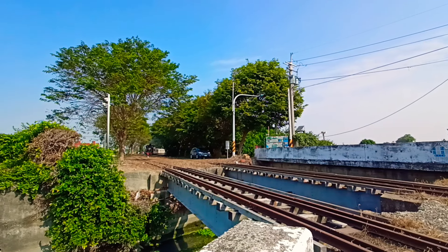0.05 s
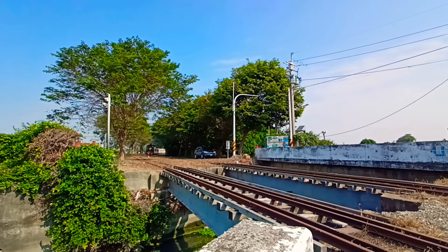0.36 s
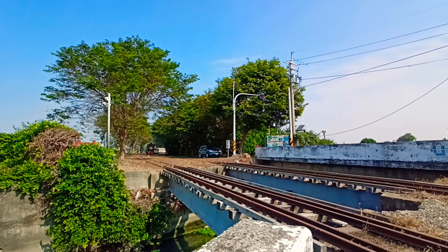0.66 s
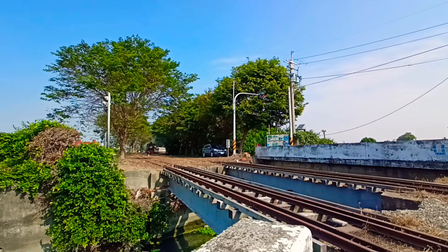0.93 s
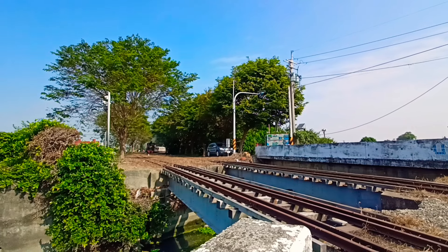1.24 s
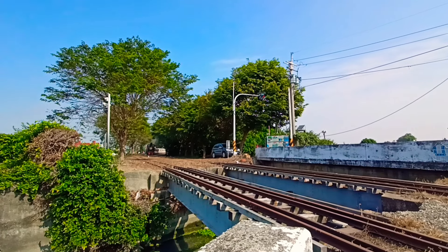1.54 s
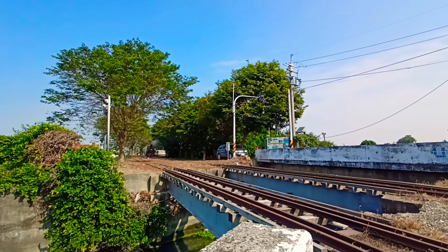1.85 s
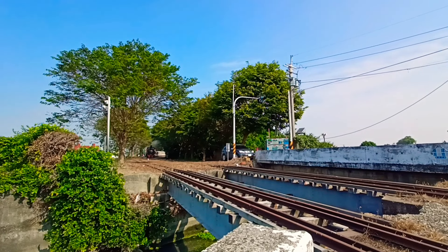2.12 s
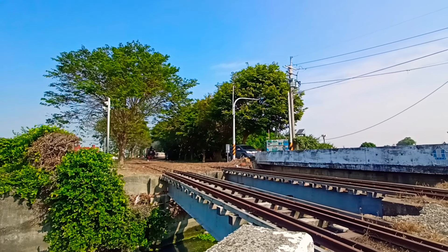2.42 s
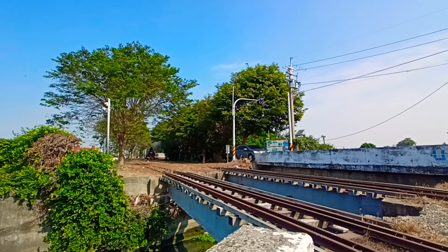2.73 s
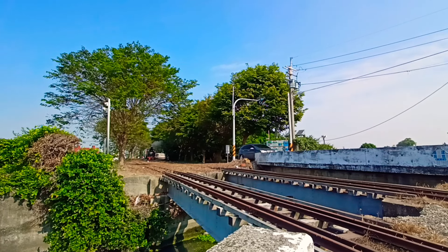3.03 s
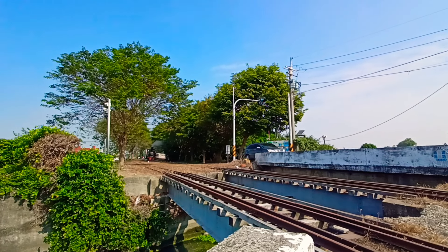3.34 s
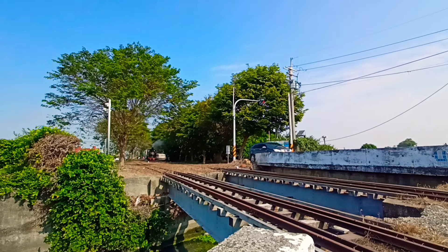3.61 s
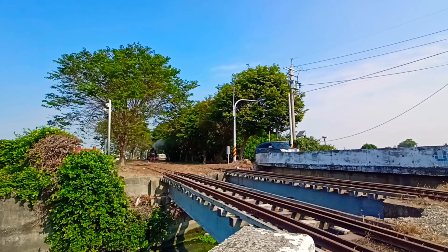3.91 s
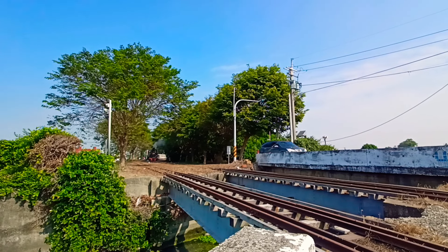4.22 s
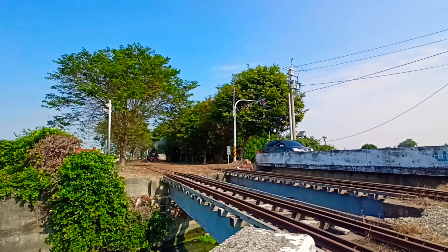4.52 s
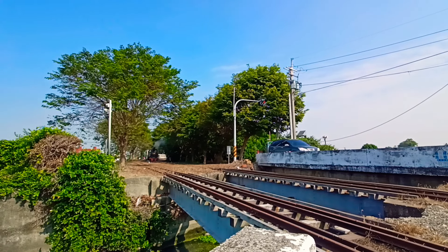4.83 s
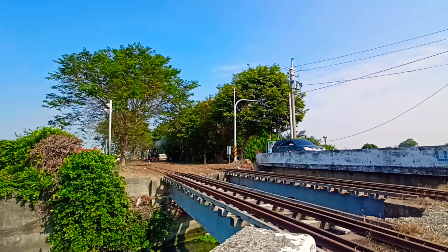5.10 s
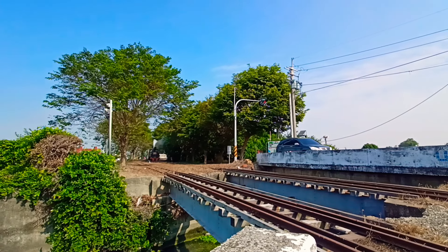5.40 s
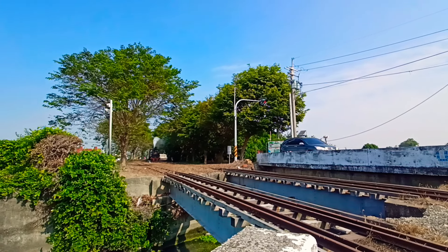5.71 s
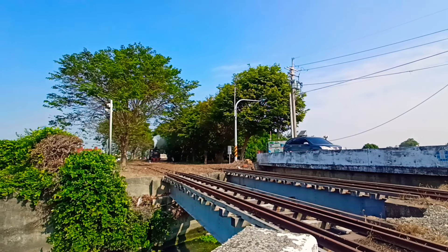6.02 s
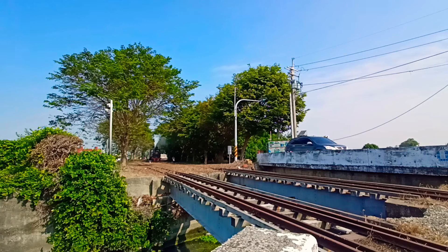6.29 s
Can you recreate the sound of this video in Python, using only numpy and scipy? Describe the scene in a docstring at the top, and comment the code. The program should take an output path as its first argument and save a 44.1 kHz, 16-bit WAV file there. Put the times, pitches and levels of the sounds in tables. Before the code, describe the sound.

Outdoors by a railway bridge, several cameras fire short bursts of shutter clicks. A small bird ticks in high trills, with scattered chirps and faint insect buzzes. A breeze rumbles softly on the microphone and a car passes faintly. Near the end, a steam locomotive blows its whistle: one loud, held note that scoops up to pitch and wavers inside a strong hiss of steam.

```python
"""Steam whistle by a railway bridge

Three cameras fire bursts of shutter clicks while small birds tick and chirp over a gusty breeze
and a slowly passing car. Then a steam locomotive opens its whistle: one pipe note that scoops
up to pitch and beats against its own echo, in the loud hiss of the steam jet."""
import sys
import numpy as np
from scipy import signal
from scipy.fft import rfft, irfft
from scipy.io import wavfile
from scipy.ndimage import uniform_filter1d, minimum_filter1d

SR = 44100
rng = np.random.default_rng(int(sys.argv[2]) if len(sys.argv) > 2 else 0)


def waveform_to_disk(signal):
    """Save audio, clipped to [-1, 1], as 16-bit WAV at the path in sys.argv[1]."""
    frames = np.transpose(np.atleast_2d(signal))
    scaled = np.clip(frames, -1, 1) * 32767
    samples = np.round(scaled).astype(np.int16)
    wavfile.write(sys.argv[1], SR, samples)


N = 288855
TIME_S = np.arange(N) / SR

# wind on the microphone: freq_hz, relative_db
WIND_SPECTRUM = [(20, -41), (35, -15), (52, -7), (85, 2), (120, 2), (170, -3), (240, -13.5), (400, -34)]
# breeze strength: time_s, level_db
WIND_LEVEL = [(0, -48), (.8, -40), (1.3, -43), (1.75, -38.5), (2.05, -49), (2.5, -43), (3, -49.5),
              (4.05, -48), (4.8, -44.5), (5.37, -40.5), (5.46, -47.5), (5.65, -45), (6.0, -57), (6.55, -54)]
# wind puffs: time_s, boost_db
GUSTS = [(.83, 4), (.93, 0), (1.02, 4.5), (1.57, 7.5), (1.68, -2), (1.79, 9), (2.43, 10.5), (4.43, 9.5),
         (4.73, 14), (4.83, 15.5), (5.05, 7.5), (5.24, 2), (5.39, 11.5)]
# far traffic: freq_hz, relative_db
ROAD_SPECTRUM = [(100, 9), (230, 4.5), (310, -1.5), (430, 1), (560, -3), (660, -5.5), (940, -8),
                 (1130, -13), (1360, -8), (1600, -13), (1860, -10), (2080, -15), (2750, -22), (4000, -23)]
# leaves and far insects: freq_hz, relative_db
FOLIAGE_SPECTRUM = [(1500, -5), (3000, -5.5), (4200, 3), (5500, -2.5), (6500, -1), (7600, 1), (8400, -3),
                    (9200, -8.5), (10500, -10.5), (11800, -16.5), (15500, -13)]
# far sounds: time_s, road_db, foliage_db
FAR_LEVELS = [(0.0, -50.5, -61), (1.3, -50, -61), (1.75, -47, -60), (2.5, -47, -60), (3.7, -48, -58.5),
              (5.2, -48.5, -57.5), (6.55, -54, -58)]
# small bird's trills: start_s, tick_count, first_gap_s, peak_db, top_hz
TRILLS = [(.0378, 4, .0454, -39.5, 5400), (.5732, 8, .0427, -37.5, 5420), (1.9132, 18, .0415, -35.3, 5380),
          (3.6529, 7, .0427, -36, 5345), (4.4444, 10, .0429, -35, 5370)]
# shutter bursts: start_s, frame_count, gap_s, level_db, camera
BURSTS = [(.238, 2, .207, -3.5, 0), (1.2794, 2, .1978, -3, 0), (2.597, 1, .3343, -4.5, 1),
          (4.317, 4, .3343, -3.3, 1), (1.605, 4, .075, -3, 2), (2.4955, 4, .075, -3.5, 2),
          (3.3147, 2, .075, -3.2, 2), (3.8156, 2, .075, -3.5, 2), (4.755, 3, .075, -3.2, 2)]
# mirror and curtain strokes per release: camera, offset_s, level_db, t60_s
STROKES = [(0, -.051, -37.5, .038), (0, -.043, -45, .065), (0, -.022, -35.5, .05), (0, 0, -32.5, .043),
           (0, .012, -43, .087), (0, .022, -42.5, .06), (0, .0395, -32.7, .04), (0, .053, -35.5, .022),
           (1, -.044, -36.5, .067), (1, -.037, -41.5, .2), (1, 0, -25, .042), (1, .0228, -24.5, .015),
           (1, .026, -28, .035), (2, 0, -33, .026), (2, .008, -40, .03), (2, .016, -41.5, .013)]
# camera body ring: freq_hz, camera0_db, camera1_db, camera2_db
BODY_SPECTRA = [(407, -31, -18, 3.5), (1100, 3, -6.5, -18), (1440, -4, -1, -4), (1900, -4.5, -1, -9),
                (2360, -5, -11.5, -32), (2620, -3.5, -2.5, 2.5), (3320, -2, -4, -7), (4060, -2, 5, 1.5),
                (4830, -0.5, -0.5, -11), (5550, 0.5, -4.5, -1), (6500, 3, -5.5, -3.5), (7430, 3.5, 4.5, 5),
                (9300, 0, -5.5, -3.5), (10900, -5, -14, -12), (12500, -8, -13, -10), (15500, -8, -19, -22)]
# sparrow-like chirps: start_s, level_db, kind
CHIRPS = [(0.589, -50, "slip"), (.912, -50.5, "cheep"), (.977, -52.5, "low"), (1.039, -53.5, "low"),
          (1.206, -53, "chur"), (1.294, -44.5, "rasp"), (1.33, -51, "fall"), (1.388, -55.5, "low"),
          (1.749, -43.5, "arch"), (2.27, -59, "fall"), (3.139, -44.5, "rasp"), (3.182, -52, "fall"),
          (3.222, -44.5, "arch"), (3.247, -53.5, "low"), (4.93, -51, "slip"), (5.069, -51, "rasp"),
          (5.144, -49.5, "slip")]
# chirp shapes by kind: length_s, start_hz, middle_hz, end_hz, warble_hz, third_harmonic_gain
CHIRP_SHAPES = {"arch": (.037, 3330, 4400, 3350, 120, 0), "cheep": (.041, 3950, 4800, 3800, 250, 0),
                "rasp": (.048, 4420, 4090, 3730, 540, 0), "fall": (.027, 3760, 2990, 2420, 110, 0),
                "low": (.027, 2050, 2010, 1970, 20, .5), "chur": (.049, 3270, 3500, 3200, 170, 0),
                "slip": (.014, 5400, 4800, 4250, 100, 0)}
# insect-like buzzes: start_s, level_db
BUZZES = [(1.388, -45), (2.244, -45.5), (2.404, -44.5), (2.6, -41.5), (2.87, -47.5), (3.403, -43),
          (3.6, -43.5), (3.74, -43), (3.938, -45.5), (4.208, -49)]
# tyre drone: freq_hz, relative_db
TYRE_SPECTRUM = [(400, -32), (450, -12), (490, -10), (555, 1), (630, -12), (880, -13), (950, -3.5),
                 (1020, -27)]
# steam jet: time_s, roar_db, sizzle_db
JET_LEVELS = [(5.24, -46, -61), (5.35, -38, -40.5), (5.395, -26, -30), (5.56, -27.5, -33),
              (5.92, -31, -31.5), (6.15, -28, -29.5), (6.27, -30, -25), (6.55, -31, -28)]
# jet roar: freq_hz, relative_db
ROAR_SPECTRUM = [(300, -43), (600, -14.5), (850, -1.5), (1100, -5), (1300, -1), (1550, -6), (1950, -3),
                 (2400, -8), (3050, -9), (3600, 1), (4600, 0.5), (5450, -9), (5800, -2), (7500, 4),
                 (8300, -3.5), (8950, -24), (9300, -6), (10500, -11)]
# jet sizzle: freq_hz, relative_db
SIZZLE_SPECTRUM = [(6000, -7.5), (8900, -4), (9400, -3), (10500, -4.5), (12000, -7), (13500, -7.5),
                   (14700, -6.5), (15500, -9)]
# whistle partials: harmonic, offset_db, echo_share, scatter_share, flutter_hz
PARTIALS = [(1, 0, 0.82, 0.17, 24), (2, 0, 0.43, 0.53, 15.3), (3, -14.5, .4, 0.56, 45), (4, .5, 0, .65, 29),
            (5, -1.5, 0.37, 0.63, 27), (6, -15.5, 0.5, .65, 25), (7, -19, .4, 0.5, 35),
            (8, -13.5, .4, 0.97, 15), (9, -30, .4, 0.7, 50), (10, -21, .4, 0.7, 50)]
# held note: time_s, fundamental_db, octave_db, upper_db
WHISTLE_LEVELS = [(5.385, -12.5, -17.5, -31), (5.415, -9.5, -16, -22.5), (5.46, -8, -15.5, -23),
                  (5.56, -8, -27.5, -24.5), (5.69, -11, -14.5, -29), (5.84, -13.5, -17.5, -26),
                  (6.07, -20, -20.5, -27.5), (6.25, -17.5, -20.5, -29), (6.42, -13.5, -23.5, -28),
                  (6.55, -14.5, -21.5, -26)]
# whistle echo against the direct note: time_s, echo_gain
ECHO_GAIN = [(5.4, 0), (5.68, .36), (5.85, .24), (5.96, .62), (6.08, .35), (6.24, .5), (6.55, .25)]


def gain_of(db):
    """Decibels to amplitude."""
    return 10 ** (np.asarray(db) / 20)


def unit_rms(x):
    """Scales to unit rms."""
    return x / np.sqrt(np.mean(abs(x) ** 2) + 1e-20)


def curve(rows, column=1):
    """One column of a time table, per sample."""
    rows = np.array(rows)
    return np.interp(TIME_S, rows[:, 0], rows[:, column])


def add(mix, start_s, sound):
    """Mixes a sound in at start_s."""
    part = mix[max(round(start_s * SR), 0):][:len(sound)]
    part += sound[:len(part)]


def coloured(x, spectrum):
    """Filters by a (freq_hz, relative_db) outline; white noise keeps its power."""
    hz, db = np.transpose(spectrum)
    f = np.fft.rfftfreq(N, 1 / SR) + 1
    skirts = (np.minimum(f / hz[0], 1) * np.minimum(hz[-1] / f, 1)) ** 2
    gain = skirts * gain_of(np.interp(np.log(f), np.log(hz), db))
    return irfft(rfft(x) * unit_rms(gain), N)


def noise(spectrum):
    """Unit noise with the given outline."""
    return coloured(rng.standard_normal(N), spectrum)


def wander(rate_hz):
    """Unit random drift up to about rate_hz."""
    f = np.fft.rfftfreq(N, 1 / SR)
    return unit_rms(irfft(rfft(rng.standard_normal(N)) / (1 + (f / rate_hz) ** 2), N))


def turbulent(x, depth_db, patch_bins):
    """Lumpy noise: time-frequency patches swell and sink."""
    bins = signal.stft(x, nperseg=256)[2]
    patches = uniform_filter1d(rng.standard_normal(bins.shape), patch_bins, 0)
    patches = unit_rms(uniform_filter1d(patches, patch_bins, 1))
    return unit_rms(signal.istft(bins * gain_of(depth_db * patches), nperseg=256)[1][:N])


def outdoors(x, wet_db, t60_s):
    """Adds sparse echoes from ground, bridge and trees."""
    t = TIME_S[:SR // 2]
    taps = rng.standard_normal(len(t)) * (rng.random(len(t)) < .03)
    taps *= (t > .006) * gain_of(-60 * t / t60_s)
    return x + gain_of(wet_db) * signal.fftconvolve(x, taps / np.linalg.norm(taps))[:N]


def wind(trim_db=.5, gust_s=.015):
    """Breeze rumbling on the microphone, with brief puffs."""
    gust_db = sum(db * np.exp(-((TIME_S - at_s) / gust_s) ** 2) for at_s, db in GUSTS)
    return noise(WIND_SPECTRUM) * gain_of(curve(WIND_LEVEL) + trim_db + gust_db)


def traffic(trim_db=2):
    """Lumpy wash of a far road."""
    wash = turbulent(noise(ROAD_SPECTRUM), depth_db=1.5, patch_bins=9)
    return wash * gain_of(curve(FAR_LEVELS, column=1) + trim_db)


def foliage(trim_db=3):
    """Thin hiss of leaves and far insects."""
    return noise(FOLIAGE_SPECTRUM) * gain_of(curve(FAR_LEVELS, column=2) + trim_db)


def ticking_bird(trim_db=.5, octave_db=-33, spread_db=.9, pitch_spread=.011):
    """Trills that slow as the bird tires; each tick hooks up to its top pitch."""
    tick_s, lead_s, gap_growth_s = .014, .003, .00074
    hook_depth, hook_s = .3, .0023
    out = np.zeros(N)
    for start_s, tick_count, gap_s, peak_db, top_hz in TRILLS:
        for k in range(round(tick_count)):
            stretch, hook_stretch = rng.uniform(.8, 1.2, 2)
            strength, detune = rng.standard_normal(2)
            t = np.arange(0, tick_s * stretch, 1 / SR)
            hook = 1 - hook_depth * np.exp(-t / (hook_s * hook_stretch))
            pitch_hz = top_hz * (1 + pitch_spread * detune) * hook
            phase = 2 * np.pi * np.cumsum(pitch_hz) / SR
            tone = (np.sin(phase) + gain_of(octave_db) * np.sin(2 * phase)) * np.hanning(len(t))
            at_s = start_s + k * gap_s + gap_growth_s * k ** 2 / 2
            add(out, at_s - lead_s, gain_of(peak_db + trim_db + spread_db * strength) * tone)
    return outdoors(out, wet_db=-6.5, t60_s=.05)


def cameras(attack_s=.00018):
    """Three shutters, each at its own rate; mirror and curtain strokes rattle the body."""
    out, t = np.zeros(N), TIME_S[:SR // 12]
    attack = 1 - np.exp(-t / attack_s)
    for camera in range(3):
        force = np.zeros(N)
        releases = [(start_s + frame * gap_s, db) for start_s, frames, gap_s, db, owner in BURSTS
                    if owner == camera for frame in range(frames)]
        strokes = [row[1:] for row in STROKES if row[0] == camera]
        for release_s, release_db in releases:
            for offset_s, stroke_db, t60_s in strokes:
                envelope = attack * gain_of(release_db + stroke_db - 60 * t / t60_s)
                add(force, release_s + offset_s, envelope * rng.standard_normal(len(t)))
        out += coloured(force, [(row[0], row[camera + 1]) for row in BODY_SPECTRA])
    return outdoors(out, wet_db=-29, t60_s=.2)


def chirping_birds(warble_rate_hz=150, suboctave_db=-15, rasp=.36):
    """Arched or falling notes from the trees, some harsh with uneven warble."""
    out, drift = np.zeros(N), wander(610)
    for start_s, level_db, kind in CHIRPS:
        length_s, start_hz, middle_hz, end_hz, warble_hz, third_gain = CHIRP_SHAPES[kind]
        t = np.arange(0, length_s, 1 / SR)
        arch_hz = np.polyval(np.polyfit([0, .5, 1], [start_hz, middle_hz, end_hz], 2), t / length_s)
        warble = np.sin(2 * np.pi * (warble_rate_hz * t + rng.random()))
        warble += rasp * drift[round(start_s * SR):][:len(t)]
        phase = 2 * np.pi * np.cumsum(arch_hz + warble_hz * warble) / SR
        tone = np.sin(phase) + gain_of(suboctave_db) * np.sin(phase / 2) + third_gain * np.sin(3 * phase)
        add(out, start_s, gain_of(level_db) * unit_rms(tone * signal.windows.tukey(len(t), .3)))
    return outdoors(out, wet_db=-6.5, t60_s=.64)


def buzzes(length_s=.035, centre_hz=6400, swing_hz=520, throb_hz=185, jitter_hz=170):
    """Insect-like buzzes: a high tone swept rapidly up and down."""
    out, t = np.zeros(N), np.arange(0, length_s, 1 / SR)
    drift = wander(870)
    for start_s, level_db in BUZZES:
        throb = np.sin(2 * np.pi * (throb_hz * t + rng.random()))
        pitch_hz = centre_hz + swing_hz * throb + jitter_hz * drift[round(start_s * SR):][:len(t)]
        tone = np.sin(2 * np.pi * np.cumsum(pitch_hz) / SR) * (1 - .51 * throb)
        add(out, start_s, gain_of(level_db) * unit_rms(tone * signal.windows.tukey(len(t), .4)))
    return outdoors(out, wet_db=-11.5, t60_s=.15)


def passing_car(level_db=-55, closest_s=2.62, half_width_s=.62):
    """Tyre drone, loudest at closest approach."""
    return noise(TYRE_SPECTRUM) * gain_of(level_db) / (1 + ((TIME_S - closest_s) / half_width_s) ** 2)


def piping_bird(level_db=-59, spread_db=1.5, pitch_hz=1350, waver=.0184):
    """A far bird repeats one soft, wavering note, blurred by echoes."""
    first_s, gap_s, length_s, note_count = 2.77, .29, .061, 11
    out, t = np.zeros(N), np.arange(0, length_s, 1 / SR)
    voice = np.sin(2 * np.pi * np.cumsum(pitch_hz * (1 + waver * wander(40.7))) / SR)
    for k, softness in enumerate(rng.standard_normal(note_count)):
        start_s = first_s + k * gap_s
        note = unit_rms(voice[round(start_s * SR):][:len(t)] * np.hanning(len(t)))
        add(out, start_s, gain_of(level_db - spread_db * softness) * note)
    return outdoors(out, wet_db=-1, t60_s=.22)


def far_engine(peak_db=-57, pitch_hz=365, waver=.0215, loudest_s=4.7, half_width_s=1.0):
    """Faint wavering hum that swells and fades on the road."""
    tone = np.sin(2 * np.pi * np.cumsum(pitch_hz * (1 + waver * wander(26))) / SR)
    return gain_of(peak_db) * tone / (1 + ((TIME_S - loudest_s) / half_width_s) ** 2)


def steam_jet(roar_trim_db=2):
    """Jet at the whistle's lip: smooth sizzle leaks out first, then a lumpy roar."""
    roar = turbulent(noise(ROAR_SPECTRUM), depth_db=2, patch_bins=7)
    roar *= gain_of(curve(JET_LEVELS, column=1) + roar_trim_db) * np.interp(TIME_S, [5.25, 5.36], [0, 1])
    sizzle = turbulent(noise(SIZZLE_SPECTRUM), depth_db=.5, patch_bins=6)
    sizzle *= gain_of(curve(JET_LEVELS, column=2)) * np.interp(TIME_S, [5.15, 5.25], [0, 1])
    return roar + sizzle


def edge_tone(start_s=5.338, length_s=.032, level_db=-38, from_hz=1050, to_hz=1400):
    """The first steam squeaks upward before the pipe catches its note."""
    out, t = np.zeros(N), np.arange(0, length_s, 1 / SR)
    squeak = signal.chirp(t, from_hz, length_s, to_hz) * signal.windows.tukey(len(t), .6)
    add(out, start_s, gain_of(level_db) * unit_rms(squeak))
    return out


def whistle(open_s=5.34, note_hz=948, jitter=.0023):
    """Steam-blown pipe; each partial sums a direct tone, a beating echo and scattered flutter."""
    scoop_hz, scoop_s = 157.6, .0323  # fast rise as pressure builds
    cold_hz, warming_s = 51, .172  # slow rise as the bell heats
    speak_s, speak_lag_s, swell_s = .033, .029, .007  # higher partials need more pressure, start later
    beat_hz, antiphase_s = 7.3, 5.963  # the locomotive moves, so its echo is slightly flat
    rebound = .37  # share of the echo that bounces again
    age_s = np.maximum(TIME_S - open_s, 0)
    pitch_hz = note_hz - scoop_hz * np.exp(-age_s / scoop_s) - cold_hz * np.exp(-age_s / warming_s)
    cycles = np.cumsum(pitch_hz * (1 + jitter * wander(72))) / SR
    out = np.zeros(N)
    for k, offset_db, echo_share, scatter_share, flutter_hz in PARTIALS:
        swell = 1 / (1 + np.exp((speak_s + speak_lag_s * np.log(k) - age_s) / swell_s))
        level = swell * gain_of(offset_db + curve(WHISTLE_LEVELS, column=min(k, 3)))
        slip = np.exp(-2j * np.pi * k * beat_hz * (TIME_S - antiphase_s))
        echo = echo_share * curve(ECHO_GAIN) * slip / (1 - rebound * slip)
        flutter = unit_rms(wander(flutter_hz) + 1j * wander(flutter_hz))
        paths = np.sqrt(1 - scatter_share ** 2) * (1 - echo) + scatter_share * flutter
        out += np.sqrt(2) * level * (paths * np.exp(2j * np.pi * k * cycles)).imag
    return out * (age_s > 0)


def scene():
    """All sources at one microphone, alike in both channels."""
    locomotive = edge_tone() + whistle() + steam_jet()
    wildlife = ticking_bird() + buzzes() + chirping_birds() + piping_bird()
    shutters = cameras()
    background = wind() + traffic() + passing_car() + foliage() + far_engine()
    mix = locomotive + wildlife + shutters + background
    return np.array([mix, mix])


def record(dry, ceiling=.93, window_samples=200, cutoff_hz=15620):
    """Fast peak limiter, then low-pass."""
    allowed_gain = np.minimum(1, ceiling / (abs(dry).max(0) + 1e-9))
    held_gain = minimum_filter1d(allowed_gain, window_samples)
    limited = dry * uniform_filter1d(held_gain, window_samples)
    lowpass = signal.firwin(801, cutoff_hz, window=("kaiser", 9), fs=SR)
    return signal.oaconvolve(limited, lowpass[None], "same")


dry = scene()
out = record(dry)
waveform_to_disk(out)
```